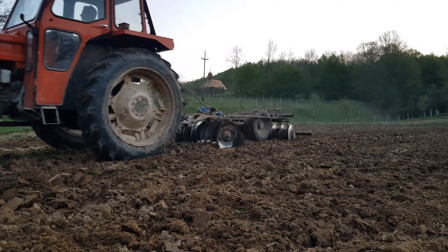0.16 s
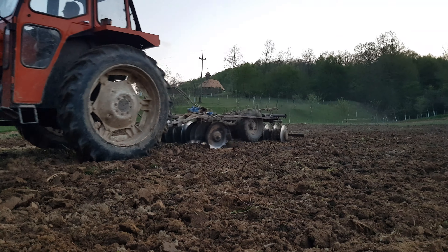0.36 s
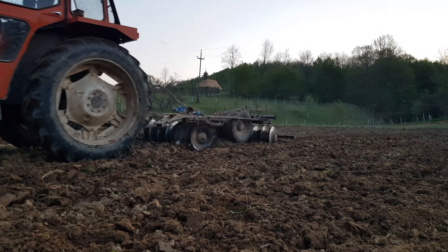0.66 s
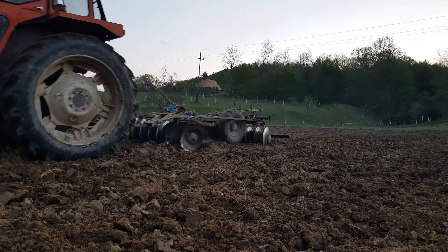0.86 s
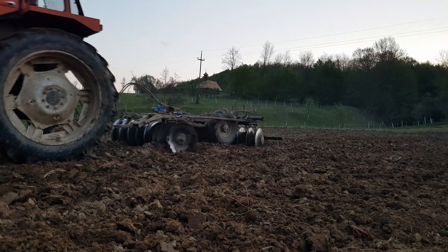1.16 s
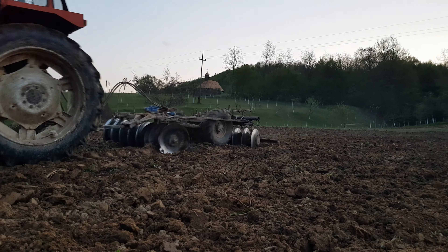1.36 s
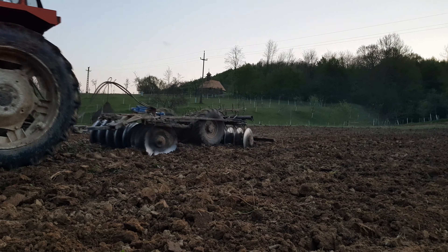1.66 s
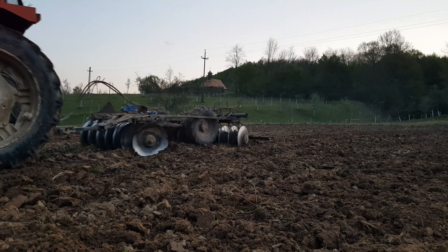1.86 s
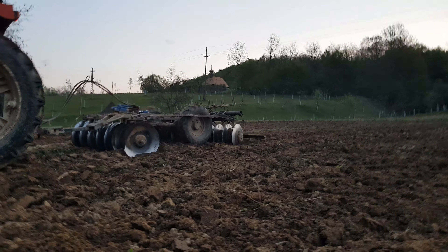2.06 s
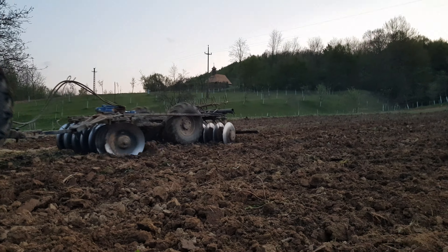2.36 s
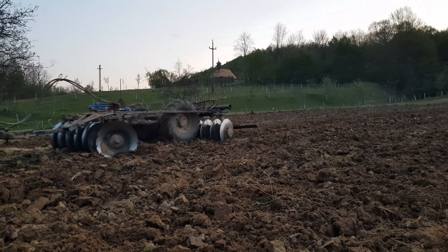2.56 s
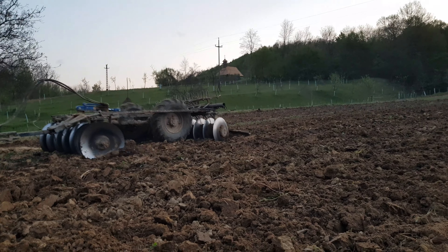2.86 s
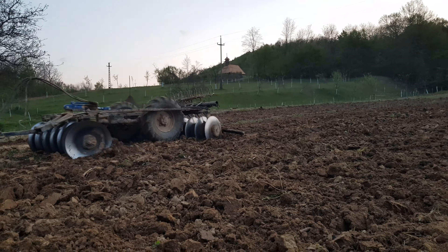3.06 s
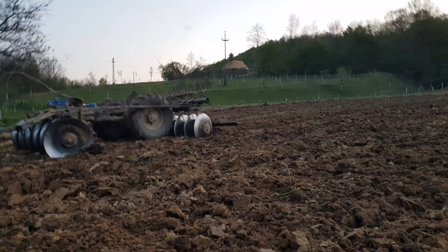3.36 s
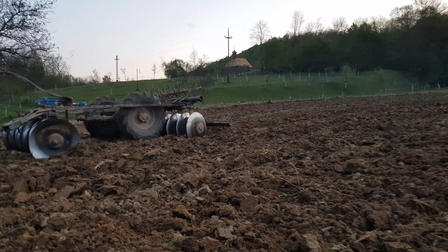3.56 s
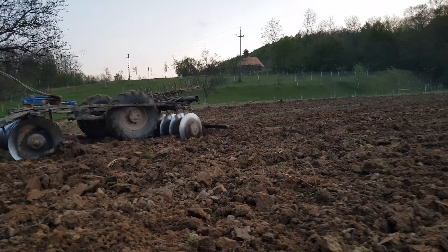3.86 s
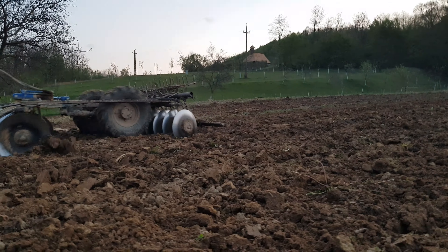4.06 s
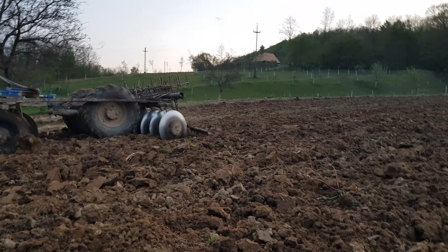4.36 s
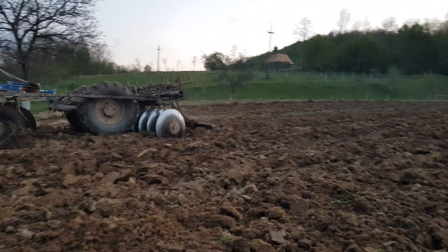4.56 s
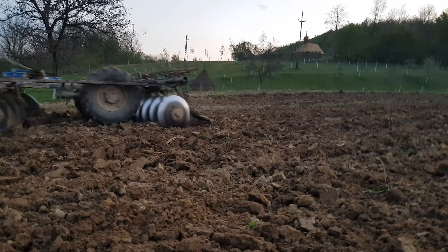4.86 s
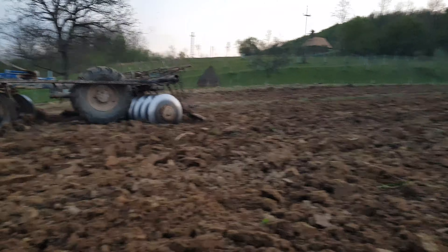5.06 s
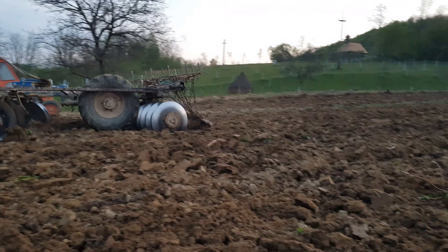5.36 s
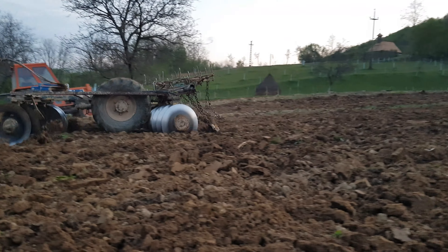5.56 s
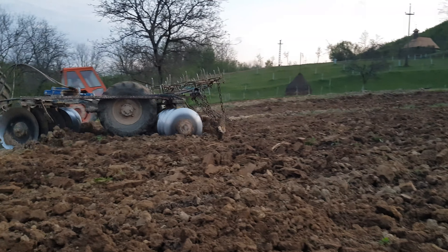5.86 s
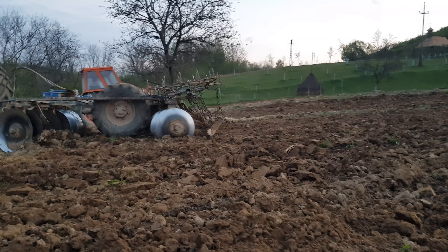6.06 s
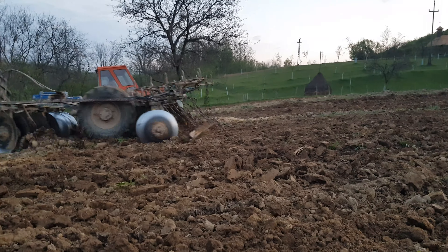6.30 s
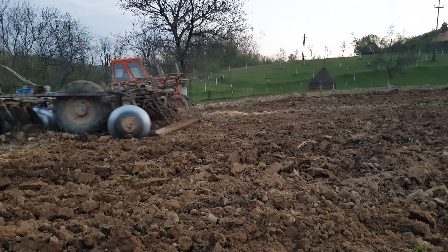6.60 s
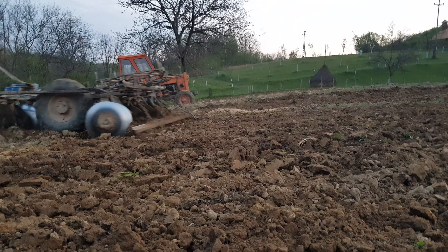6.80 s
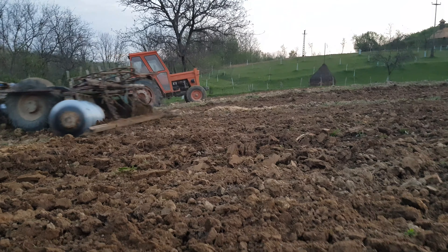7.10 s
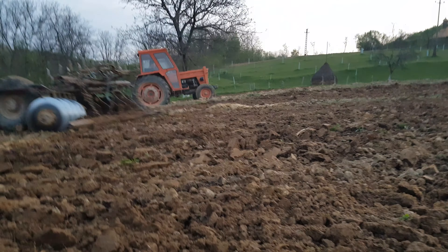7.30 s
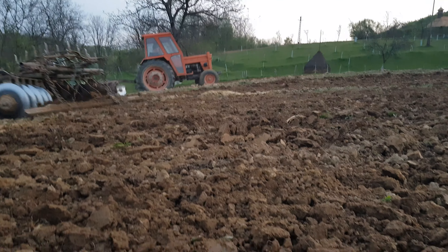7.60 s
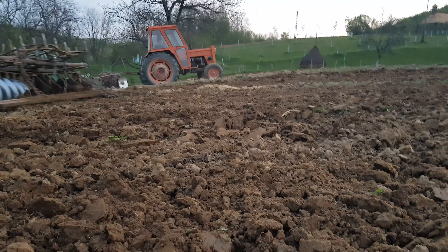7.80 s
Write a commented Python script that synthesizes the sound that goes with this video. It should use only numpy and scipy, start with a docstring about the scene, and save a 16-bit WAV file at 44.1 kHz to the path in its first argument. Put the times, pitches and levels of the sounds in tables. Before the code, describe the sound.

In an open field, a diesel tractor thumps and knocks close by on the left, pulling a disc harrow that crunches steadily through loose soil. The harrow's metal body jolts several times, and later a dry bearing gives a thin, high squeal with short squeaks. As the first tractor drives off, a second, faster-running one revs up, draws nearer from the left and takes over with a strong drone.

```python
"""A diesel tractor drums and knocks close by, dragging a disc harrow through loose soil.
Each firing thumps the exhaust and rings the engine block; the intake gulps in between.
Behind it the discs crunch through clods, the frame jolts, and a dry bearing sticks, slips and squeals.
A second, faster-running tractor draws near from the left and takes over as the first drives off."""
import sys
import numpy as np
from scipy import signal
from scipy.fft import rfft, irfft, next_fast_len
from scipy.io import wavfile
from scipy.ndimage import map_coordinates

SR = 44100
rng = np.random.default_rng(int(sys.argv[2]) if len(sys.argv) > 2 else 0)


def waveform_to_disk(signal):
    """Save audio, clipped to [-1, 1], as 16-bit WAV at the path in sys.argv[1]."""
    frames = np.transpose(np.atleast_2d(signal))
    scaled = np.clip(frames, -1, 1) * 32767
    samples = np.round(scaled).astype(np.int16)
    wavfile.write(sys.argv[1], SR, samples)


N = 350154
TIME = np.arange(N) / SR

# colour of the puff from either exhaust pipe: f/Hz, relative level/dB
PUFF_COLOUR = [(20, -38), (45, -1), (80, 0.5), (130, 4), (200, -3.5), (330, -8.5), (500, -17.5), (900, -30),
               (3000, -72)]
# how alike the two ears are: f/Hz, correlation
EAR_LIKENESS = [(100, .995), (600, 0.79), (1300, 0.93), (2300, 0.76), (3500, 0.15), (6000, 0.23),
                (16000, .35)]


def near_tractor():
    """Slow four-cylinder diesel: a hard knock, then a puff from the pipe; the intake gulps once a cycle."""
    # engine speed, hunting under load, then picking up: t/s, firing rate/Hz
    speed = [(0, 30.15), (.99, 30.96), (1.26, 30.09), (1.69, 31.22), (2.11, 30.45), (2.61, 31.38),
             (2.93, 30.63), (4.38, 31.79), (4.72, 31.57), (6.23, 34.21), (6.75, 34.83), (7.94, 38.24)]
    # the pass-by: t/s, knock level/dB, gulp level/dB
    pass_by = [(0, -31, -42.5), (1.9, -30.5, -44), (2.7, -34.5, -42), (3.5, -33.5, -38), (4.2, -35.5, -41),
               (5.2, -40.5, -50), (6, -51, -56), (7.94, -70, -72)]
    # exhaust boom and overtones: multiple of the firing rate, relative level/dB
    boom_orders = [(1, -33), (2, 0.5)]
    overtone_orders = [(3, 2), (4, -15), (5, -11), (6, -14.5), (7, -21.5), (8, -32)]
    # accent of each cylinder: level/dB
    cylinders = [-1, 1.5, 3, -0.5]
    # extra hard firings: t/s, boost/dB
    hard_firings = [(.037, 0.5), (.169, 1.5), (.2, 2.5), (.594, 1.5), (1.246, 2), (1.345, 3), (1.478, 2.5),
                    (1.733, 3.5), (1.863, 1.5), (1.896, 0), (2.287, 2), (3.061, 3), (3.576, 3),
                    (3.964, 1.5), (4.333, 3)]
    # colours of knock and intake: f/Hz, relative level/dB
    knock_colour = [(200, -46), (550, -6), (800, -3), (1200, 6), (1700, -2.5), (2300, -1.5), (3300, -1.5),
                    (4300, -9), (6000, -4), (8300, -17), (11500, -11.5), (16000, -13)]
    gulp_colour = [(200, -27), (380, -32), (450, 2.5), (570, 9), (680, -15), (1200, -30), (4000, -60)]
    # engine block resonances: f/Hz, width/Hz, relative level/dB
    block_modes = [(1842, 115, -11.5), (2102, 170, -9.5), (2382, 54, -10), (2610, 50, -27.5),
                   (2781, 65, -11), (2826, 370, -14.5), (4150, 330, -8.5), (5650, 1200, -17)]
    # the gulp rises as the tractor goes past: t/s, pitch ratio
    gulp_glide = [(2.2, .93), (3.3, 1.0), (4.3, 1.08)]
    # ground bounce, hollowing the sound in notches that move with distance: t/s, delay/ms
    ground_bounce = [(0, 1.57), (1.5, 2.29), (3, 2), (4.3, 1.846), (7.94, 0.94)]
    # direction: t/s, left-ear lead/ms
    direction = [(0, .3), (1.9, 0.46), (4.7, 0.463), (7.94, 0.47)]

    rate, = in_time(speed)
    knock_db, gulp_db = in_time(pass_by)
    firings = np.cumsum(rate) / SR + .1
    pipe = firings - .25
    # driving off, the overtones fade faster than the boom
    boom = exhaust(pipe, boom_orders, level_db=-27 - 0.87 * TIME, skew=0.73, flutter=0.2)
    overtones = exhaust(pipe, overtone_orders, level_db=-26.5 - 2 * TIME, skew=0.67, flutter=0.2)
    accents = from_db(sum(db * np.exp(-((TIME - s) / 0.0054) ** 2) for s, db in hard_firings))
    knock = noise(knock_colour)
    knock *= rms_one(0.082 + bursts(firings, cylinders, rise=0.22, decay=0.17, scatter_db=2))
    # every firing strikes each block mode with its own strength, so no two knocks share a colour
    clatter = sum(from_db(db) * ringing(hz, width)
                  * rms_one(bursts(firings, cylinders, rise=0.13, decay=0.37, scatter_db=2.5))
                  for hz, width, db in block_modes)
    puff = noise(PUFF_COLOUR)
    puff *= rms_one(0.1 + bursts(firings - .4, [0, -1, 1, 0], rise=0.13, decay=0.4, scatter_db=1))
    gulp = repitched(noise(gulp_colour), *in_time(gulp_glide))
    gulp *= rms_one(0.12 + bursts(firings - .2, [-1.5, -19, -13, -3], rise=.23, decay=.39, scatter_db=1))
    engine = accents * (from_db(-2.5) * knock + from_db(-2) * clatter) + from_db(2) * puff
    direct = from_db(knock_db) * engine + from_db(gulp_db) * gulp
    hollowed = echoed(direct, *in_time(ground_bounce), share=0.29, dull_hz=9000)
    return from_left(hollowed + boom + overtones, *in_time(direction))


def far_tractor():
    """A faster diesel: strong exhaust drone and steady knock in ringing panels, with one close echo."""
    # engine revving up to working pace: t/s, firing rate/Hz
    speed = [(0, 41.81), (1.99, 45.41), (2.5, 48.21), (4.02, 54.15), (4.24, 52.05), (4.52, 57.06),
             (4.97, 55.56), (5.49, 56.01), (6.77, 53.92), (7.14, 57.61), (7.94, 57.51)]
    # exhaust drawing near: t/s, boom level/dB, overtone level/dB
    exhaust_approach = [(0, -48, -48), (1, -44, -47), (3.2, -30, -32), (4.7, -24.5, -29.5),
                        (6, -23.5, -25.5), (7, -26, -24), (7.94, -24.5, -30)]
    # knock drawing near: t/s, level/dB
    knock_approach = [(0, -34), (4, -40.5), (5.3, -36.5), (6, -33), (6.7, -30.5), (7.3, -31), (7.94, -31.5)]
    # exhaust boom and overtones: multiple of the firing rate, relative level/dB
    boom_orders = [(1, 0)]
    overtone_orders = [(2, 0.5), (3, -18), (4, -22), (5, -37), (6, -26.5)]
    # accent of each cylinder: level/dB
    cylinders = [0, -1, -1, 0]
    # colour of the knock: f/Hz, relative level/dB
    knock_colour = [(200, 14.5), (400, -22), (550, -1), (800, -6.5), (1050, 3), (1400, -1.5), (1620, -2),
                    (2200, 5.5), (2800, 1), (3250, -2), (4300, 1.5), (5300, -11), (6800, -8), (8300, -19.5),
                    (11500, -14), (16000, -16.5)]
    # resonances of the panels and of a bright ring: f/Hz, width/Hz, relative level/dB
    panel_modes = [(752, 110, -10.5), (1220, 150, -11.5), (1460, 140, -11), (2005, 54, -15),
                   (2303, 190, -12), (2830, 160, -20)]
    bright_modes = [(4280, 260, 4), (4400, 200, -7)]
    # the echo closes in as the tractor nears: t/s, delay/ms
    reflection = [(0, 2.3), (6.6, 2.223), (7.94, 2.07)]
    # direction: t/s, left-ear lead/ms
    direction = [(0, .45), (5, 0.24), (7.94, 0.075)]

    rate, = in_time(speed)
    boom_db, overtone_db = in_time(exhaust_approach)
    knock_db, = in_time(knock_approach)
    firings = np.cumsum(rate) / SR + .16
    pipe = firings - .66
    boom = exhaust(pipe, boom_orders, boom_db, skew=0, flutter=0.094)
    overtones = exhaust(pipe, overtone_orders, overtone_db, skew=0.043, flutter=0.053)
    blows = rms_one(.35 + bursts(firings, cylinders, rise=.3, decay=.33, scatter_db=.9))
    body = noise(knock_colour) + sum(from_db(db) * ringing(hz, width) for hz, width, db in panel_modes)
    knock = rms_one(echoed(body * blows, *in_time(reflection), share=0.34, dull_hz=4000))
    # the bright ring swells and fades once, near the end
    swell = from_db(peaked(s=7.3, top=-41, rise_per_s=39, fall_per_s=35))
    ring = swell * blows * sum(from_db(db) * ringing(hz, width) for hz, width, db in bright_modes)
    puff = from_db(-4) * noise(PUFF_COLOUR)
    return from_left(from_db(knock_db) * (knock + puff) + ring + boom + overtones, *in_time(direction))


def exhaust(firings, orders, level_db, skew, flutter):
    """The pipe drones on clean multiples of the firing rate, each wavering a little with the load."""
    partials = (from_db(db) * (1 + flutter * drift(22)) * np.cos(2 * np.pi * (order * firings + skew))
                for order, db in orders)
    return from_db(level_db) * np.sqrt(2) * sum(partials)


def harrow():
    """Discs crunch through clods, the frame jolts, and a dry bearing squeals."""
    # crunch of the discs in the soil: t/s, level/dB
    crunch_level = [(0, -38), (1.3, -33.5), (4.4, -36), (5, -33.5), (5.8, -38), (7.94, -40)]
    # jolts of the frame: t/s, level/dB, decay/s
    frame_hits = [(3.389, -25.5, 0.034), (4.327, -27, 0.029), (4.928, -24, 0.034), (5.3, -29, .008),
                  (5.741, -30, 0.0093), (6.645, -22.5, 0.0055), (7.182, -29, 0.012)]
    # colours of soil and jolts: f/Hz, relative level/dB
    soil_colour = [(100, -7), (250, 5.5), (400, -5), (550, 3.5), (800, 1), (1200, 0), (1700, 0),
                   (2300, -1.5), (3300, -9), (4300, -8), (6000, -15.5), (8300, -23), (11500, -19.5),
                   (16000, -26)]
    jolt_colour = [(150, -22), (600, 9), (1600, 10.5), (3000, 3), (4500, -1), (6500, -3), (9000, -13),
                   (16000, -6)]
    # direction: t/s, left-ear lead/ms
    direction = [(0, 0.23), (1.3, 0.35), (3.5, 0.45), (6.5, .38), (7.94, 0.23)]

    clods_per_s, crumble_s = 160, 0.0032
    crunch_db, = in_time(crunch_level)
    clods = (rng.random(N) < clods_per_s / SR) * from_db(2.3 * np.minimum(rng.exponential(1, N), 4))
    crumbling = signal.lfilter([1], [1, -np.exp(-1 / (crumble_s * SR))], clods)
    grit = noise(soil_colour) * rms_one(1 + 0.34 * crumbling)
    crunch = from_db(crunch_db + 0.64 * drift(14)) * grit
    jolts = sum(from_db(db) * (TIME >= s) * np.exp(-np.abs(TIME - s) / decay)
                for s, db, decay in frame_hits)
    return from_left(crunch + jolts * noise(jolt_colour) + bearing_squeal(), *in_time(direction))


def bearing_squeal():
    """Stick and slip keeps one disc mode singing; each grab swells and sharpens it and adds an octave."""
    # grabs of the dry bearing: t/s, hold/s, level/dB, octave re the tone/dB
    squeaks = [(5.108, 0.14, -53, -4), (5.383, .01, -44, -30), (5.47, 0.035, -48, -25),
               (5.55, .015, -45, -12), (5.666, 0.025, -34, -27), (5.929, .015, -38.5, -28),
               (6.003, .01, -41.5, -28), (6.116, .04, -38, -36), (6.31, .07, -43, -27),
               (6.478, 0.037, -50, -25)]

    sharpen_hz, wobble_hz, roughness = 24.9, 13.05, 0.0035
    level = from_db(-48.5) * envelope(start=4.61, attack=0.43, hold=1.6, release=0.215)
    octave = np.zeros(N)
    # the pitch climbs slowly, tops out near 6.2 s, then falls faster
    hz = peaked(s=6.2, top=4923, rise_per_s=100, fall_per_s=240)
    for start, hold, db, octave_db in squeaks:
        grab = envelope(start, attack=0.0227, hold=hold, release=0.0366)
        level += from_db(db) * grab
        octave += from_db(db + octave_db) * grab
        hz += sharpen_hz * grab
    phase = 2 * np.pi * np.cumsum(hz * (1 + roughness * drift(450)) + wobble_hz * drift(18)) / SR
    flutter = from_db(2.7 * drift(90))
    return np.sqrt(2) * flutter * (level * np.sin(phase) + octave * np.sin(2 * phase))


def bursts(firings, cylinders_db, rise, decay, scatter_db):
    """A swell and decay at each firing (times in firing periods); no two are equally strong."""
    count, phase = np.floor(firings).astype(int), firings % 1
    scatter = scatter_db * rng.standard_normal(size=600)[count]
    strength = from_db(np.take(cylinders_db, count, mode="wrap") + scatter)
    swell = np.sin(np.pi / 2 * phase / rise) ** 2
    return strength * np.where(phase < rise, swell, np.exp(-(phase - rise) / decay))


def ringing(hz, width_hz):
    """Random contacts keep one mode ringing; its skirts fall away steeply."""
    mid, side = rng.standard_normal((2, N))
    alike = np.clip(np.interp(hz, *np.transpose(EAR_LIKENESS)), 0, 1)
    ears = np.sqrt(1 + alike) * mid + np.sqrt(1 - alike) * side * np.array([[1], [-1]])
    return rms_one(resonance(resonance(ears, hz, width_hz), hz, 5 * width_hz))


def noise(spectrum):
    """Stereo noise of a given colour, narrow in the bass and wide in the treble."""
    alike = np.clip(per_bin(EAR_LIKENESS), 0, 1)
    gain = from_db(per_bin(spectrum)) * np.sqrt([1 + alike, 1 - alike])
    mid, side = coloured(rng.standard_normal((2, N)), gain)
    return rms_one(np.array([mid + side, mid - side]))


def echoed(x, ms, share, dull_hz):
    """Add one close reflection, duller than the direct sound, to both ears."""
    hz = np.fft.rfftfreq(next_fast_len(N), 1 / SR)
    dull = coloured(x, 1 / (1 + (hz / dull_hz) ** 2))
    return x + share * np.array([delayed(ear, ms) for ear in dull])


def from_left(x, lead_ms):
    """Sound from the left reaches the right ear later."""
    return np.array([x[0], delayed(x[1], lead_ms)])


def delayed(x, ms):
    """A gliding delay."""
    return map_coordinates(x, [np.arange(N) - ms * SR / 1000], order=3, mode="mirror")


def repitched(x, ratio):
    """Play both ears at a changing speed."""
    return np.array([map_coordinates(ear, [np.cumsum(ratio)], order=1, mode="mirror") for ear in x])


def resonance(x, hz, width_hz):
    """A two-pole peak of gain 1."""
    r = np.exp(-np.pi * width_hz / SR)
    feedback = [1, -2 * r * np.cos(2 * np.pi * hz / SR), r * r]
    return signal.lfilter(np.array([1, 0, -1]) * (1 - r * r) / 2, feedback, x)


def coloured(x, gain):
    """Equalise with a gain per FFT bin."""
    size = next_fast_len(N)
    return irfft(rfft(x, size) * gain, size)[..., :N]


def envelope(start, attack, hold, release):
    """Rise, hold, then die away; times in seconds."""
    age = TIME - start
    return np.clip(age / attack, 0, 1) * np.exp(-np.clip((age - attack - hold) / release, 0, 20))


def peaked(s, top, rise_per_s, fall_per_s):
    """A steady climb to a top at time s, then a steady fall."""
    return top - np.maximum(rise_per_s * (s - TIME), fall_per_s * (TIME - s))


def drift(rate):
    """A random wander with spread 1 and about `rate` turns a second."""
    knots = rng.standard_normal(4000)
    return np.interp(TIME * rate, np.arange(len(knots)), knots) * np.sqrt(3 / 2)


def in_time(rows):
    """Each column of an automation curve, sample by sample."""
    s, *columns = np.transpose(rows)
    return [np.interp(TIME, s, c) for c in columns]


def per_bin(points):
    """A curve over log frequency, read at every FFT bin."""
    hz, value = np.transpose(points)
    return np.interp(np.log(np.fft.rfftfreq(next_fast_len(N), 1 / SR) + 1), np.log(hz), value)


def from_db(db):
    """Decibels to gain."""
    return 10 ** (np.asarray(db) / 20)


def rms_one(x):
    """Scale to unit power."""
    return x / np.sqrt(np.mean(x ** 2) + 1e-20)


def scene():
    """Two tractors and the harrow in the open field."""
    return near_tractor() + far_tractor() + harrow()


def record(dry):
    """Each microphone port colours its side; the top is cut."""
    # balance between the ports: f/Hz, left minus right/dB
    port_balance = [(100, 1.5), (500, 1.5), (900, 0.5), (1500, -3), (2400, -1.5), (3500, 1), (4300, 3),
                    (5500, -9.5), (6900, 2), (8300, 11.5), (10000, 9), (12000, 2.5), (16000, -1)]

    cutoff_hz = 15900
    sound = coloured(dry, from_db(per_bin(port_balance) * np.array([[.5], [-.5]])))
    return signal.sosfilt(signal.ellip(12, .1, 80, cutoff_hz, fs=SR, output="sos"), sound)


dry = scene()
out = record(dry)
waveform_to_disk(out)
```